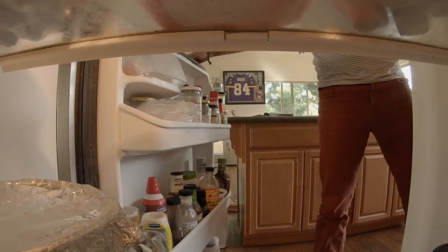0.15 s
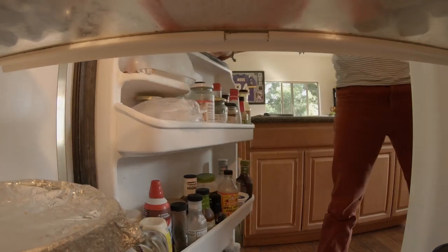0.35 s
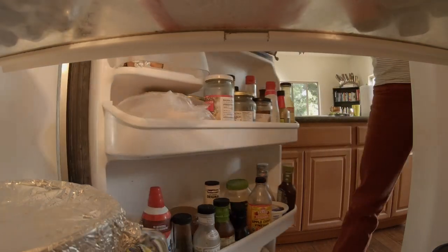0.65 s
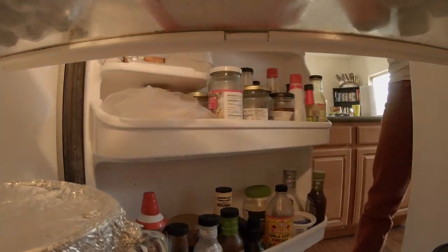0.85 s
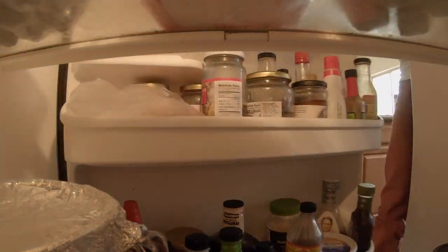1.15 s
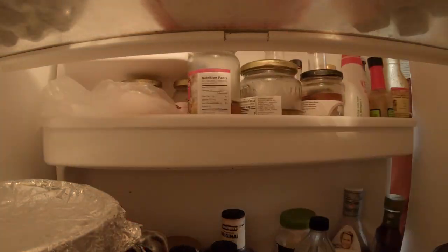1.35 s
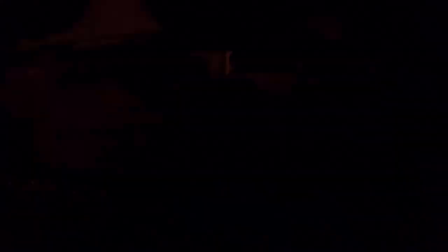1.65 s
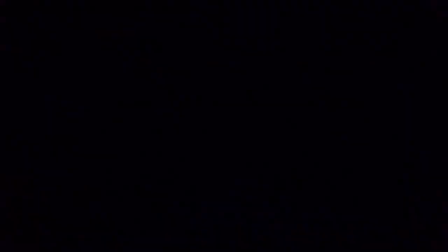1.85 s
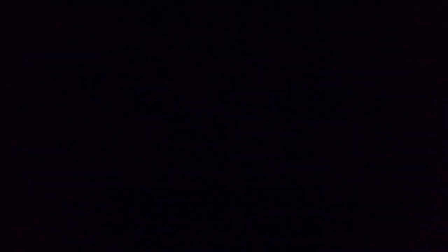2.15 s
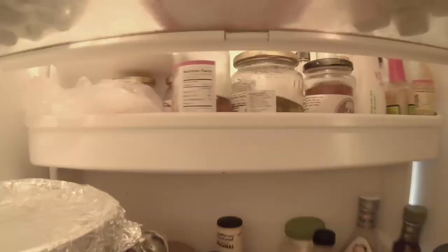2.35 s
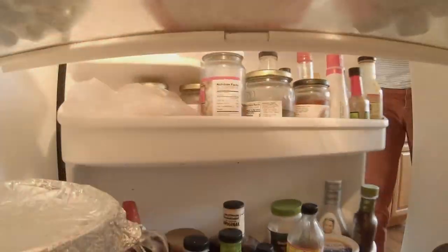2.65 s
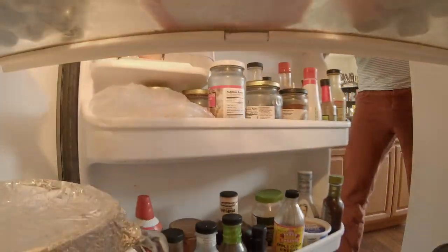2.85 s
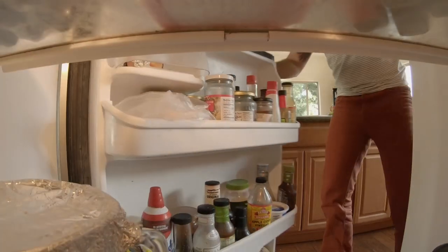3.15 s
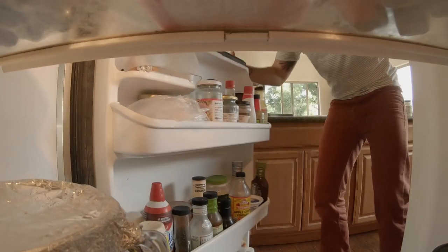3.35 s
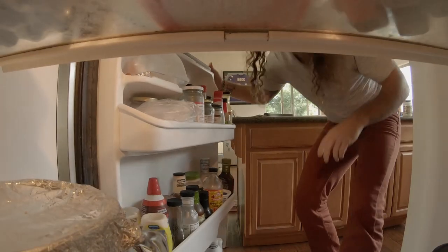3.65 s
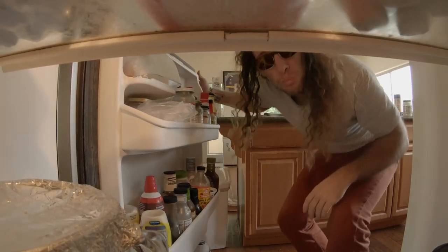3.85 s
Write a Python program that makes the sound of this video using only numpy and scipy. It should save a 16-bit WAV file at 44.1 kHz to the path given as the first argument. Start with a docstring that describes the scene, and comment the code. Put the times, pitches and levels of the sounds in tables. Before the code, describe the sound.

From a shelf inside a refrigerator, the door clicks a switch and thumps shut, jars and bottles rattling. The hum softens, then the gasket peels and pops open again; close stereo microphone in a kitchen.

```python
"""A refrigerator door swings in, trips the light switch and thumps shut, heard from a shelf inside:
low decaying sines for the blows, banded noise bursts for the contacts, dying partials for what rings.
Jars and bottles rattle in the racks and settle; the gasket peels open in a crackle and a pop.
Compressor and fan hum throughout as sine lines, softer after the door has shut, with shaped noise
for the fan air, the closed cabinet, the kitchen and the clothing that brushes past."""
import sys
import numpy as np
from scipy import signal
from scipy.fft import rfft, irfft
from scipy.io import wavfile
from scipy.ndimage import uniform_filter1d

SR = 44100
rng = np.random.default_rng(int(sys.argv[2]) if len(sys.argv) > 2 else 0)


def transcribe(signal):
    """Save signal, clipped to [-1, 1], as a 16-bit WAV file at the path in sys.argv[1]."""
    frames = np.atleast_2d(signal).T
    limited = np.clip(frames, -1, 1)
    pcm = np.round(limited * 32767).astype(np.int16)
    wavfile.write(sys.argv[1], SR, pcm)


N = 176400
T = np.arange(N) / SR  # seconds

# Colour of the plastic door racks. Each row: frequency in Hz, relative level in dB.
RACK_COLOUR = [(170, -6), (290, 7.5), (400, -2), (560, -5), (850, 1.5), (1050, -5.5), (1400, -2.5),
               (2000, -0.5), (3100, -5), (4000, -11), (4900, -15), (5500, -7.5), (7800, -8.5),
               (8600, -19.5), (12000, -33.5), (15500, -44)]
HUM_WAVER_DB, HUM_WANDER_RAD = 1.48, 0.12  # rms drift of each line's level and phase


def amp(db):
    """Decibels to gain."""
    return 10 ** (np.asarray(db) / 20)


def unit(x):
    """Scales to rms 1."""
    return x / np.sqrt(np.mean(x ** 2) + 1e-20)


def curve(points):
    """A control curve at every sample, straight between its points."""
    return np.interp(T, *np.transpose(points))


def spectrum(points, hz):
    """Reads a table on a log-frequency axis."""
    f, value = np.transpose(points)
    return np.interp(np.log(hz + 1), np.log(f + 1), value)


def pan(db):
    """Left and right gains for a level difference."""
    return amp(np.array([np.atleast_1d(db), -np.atleast_1d(db)]) / 2)


def pair(a, b, same):
    """Two channels of given likeness from two unrelated noises."""
    same = np.clip(same, -1, 1)
    mid = np.sqrt((1 + same) / 2) * a
    side = np.sqrt((1 - same) / 2) * b
    return np.array([mid + side, mid - side])


def decay(t, t60):
    """Falls 60 dB in t60."""
    return np.exp(-np.log(1000) * t / t60)


def soft_rise(t, rise):
    """A rounded onset, as of a blow that takes a moment to press in."""
    return 1 - np.exp(-(t / rise) ** 2)


def add(mix, s, sound):
    """Mixes a sound in at a time."""
    part = mix[:, round(s * SR):][:, :sound.shape[-1]]
    part += sound[..., :part.shape[1]]


def drift(count=24):
    """A slow random curve through a given count of random values."""
    values = signal.resample(rng.standard_normal(count), count * 10)
    return np.interp(T, np.linspace(0, T[-1], count * 10), values)


def swells(rows):
    """Smooth bumps of level."""
    return sum(amp(db) * np.exp(-((T - s) / width) ** 2) for s, width, db in rows)


def ring(modes):
    """A struck object: a few dying partials, each ear with its own phase."""
    t = np.arange(SR // 2) / SR
    out = np.zeros((2, len(t)))
    for hz, db, t60 in modes:
        phase = 2 * rng.random((2, 1))  # radians
        out += amp(db) * decay(t, t60) * np.sin(2 * np.pi * hz * t + phase)
    return np.minimum(t / 0.005, 1) * out  # 5 ms fade-in


def ring_at(s, modes):
    """One ringing blow placed in the scene."""
    out = np.zeros((2, N))
    add(out, s, ring(modes))
    return out


def crackle(colour, grain_db, same, size=48):
    """Countless tiny contacts of uneven strength, in a given colour."""
    strength = amp(grain_db * np.repeat(rng.standard_normal(N // size + 1), size)[:N])
    grains = rng.standard_normal((2, N)) * strength
    gain = amp(spectrum(colour, np.fft.rfftfreq(N, 1 / SR)))
    return unit(pair(*irfft(rfft(grains) * gain, N), same))


def air(colour):
    """Stereo noise in a given colour, with narrow fixed ripples over pitch and drifting patches."""
    # Each row: frequency in Hz, left-right difference in dB.
    balance = [(60, 2.5), (150, -3), (380, -5.5), (950, -1.5), (2400, -.5), (15000, 1)]
    # Each row: frequency in Hz, left-right likeness from 0 to 1.
    likeness = [(60, 0.97), (150, 0.99), (380, 0.72), (950, 0), (2400, 0.58), (6000, 0.15), (15000, 0.063)]
    patch_db, ripple_db = 1.2, 2.8
    hz = np.fft.rfftfreq(4096, 1 / SR)
    a, b, c, d, patches = rng.standard_normal((5, N // 1024 + 4, len(hz)))
    patches = uniform_filter1d(patches, size=4, axis=0)  # along time
    patches = unit(uniform_filter1d(patches, size=30, axis=1))  # along pitch
    ripple = unit(uniform_filter1d(rng.standard_normal(len(hz)), size=6))
    ripple = ripple * np.clip(hz / 600 - 0.5, 0, 1)  # none below 300 Hz, full from 900 Hz
    z = pair(a + 1j * b, c + 1j * d, spectrum(likeness, hz))
    z = z * pan(spectrum(balance, hz))[:, None]
    z = z * amp(spectrum(colour, hz) + patch_db * patches + ripple_db * ripple)
    return unit(signal.istft(z.transpose(0, 2, 1), nperseg=4096, noverlap=3072)[1][:, :N])


def door_thumps():
    """Low blows of the door on the cabinet and the trapped air: sines that die away."""
    # Each row: start in seconds, pitch in Hz, level in dB, t60 in seconds.
    blows = [(1.639, 34.3, -3.5, 0.15), (1.715, 27.2, -13, 0.34), (1.843, 97, -22, 0.1),
             (2.276, 36.8, -19.5, 0.14)]
    out, t = np.zeros((2, N)), np.arange(SR // 2) / SR
    for s, hz, db, t60 in blows:
        envelope = soft_rise(t, 0.0064) * decay(t, t60)
        thump = -np.sin(2 * np.pi * hz * t) * envelope  # the first swing is negative
        add(out, s, amp(db) * pan(db=-3.0) * thump)
    return out


def knock(levels_db, shaken, size=16384):
    """A grainy plastic clack dies quickly, leaving the cabinet's tail and the ring of any shaken jars."""
    # Each row: lower edge in Hz, rise in s, t60 of the contact in s, t60 of the cabinet in s,
    # cabinet level in dB against the contact, left-right likeness, left-right difference in dB.
    bands = [(170, .002, .08, .33, -17, .6, -3), (540, .002, .07, .3, -16, .1, -3),
             (1400, .0018, .06, .24, -19, .5, -1), (4900, .002, .065, .2, -21, .1, 0)]
    # Ringing of the jars and racks. Each row: pitch in Hz, relative level in dB.
    jar_modes = [(414, 2), (674, 1), (895, 2), (1664, 2), (2128, 3), (2750, 1), (3709, -5), (5538, -1),
                 (6108, -1), (7088, -2)]
    jar_db, jar_scatter_db = -15, 3.5
    jar_t60_s, jar_damping = 0.24, 0.2  # t60 at 1 kHz; it falls with pitch by this power
    t, hz = np.arange(size) / SR, np.fft.rfftfreq(size, 1 / SR)
    strength = amp(3.0 * np.repeat(rng.standard_normal(size // 32), 32))  # grains vary by 3 dB rms
    grains = rng.standard_normal((2, size)) * strength
    z = rfft(grains) * amp(spectrum(RACK_COLOUR, hz))
    out = np.zeros((2, size))
    tops = [band[0] for band in bands[1:]] + [SR / 2]
    for db, top, band in zip(levels_db, tops, bands):
        low, rise, t60, tail_t60, tail_db, same, pan_db = band
        edges = np.sqrt((1 + (low / (hz + 1)) ** 10) * (1 + (hz / top) ** 20))
        noise = pair(*irfft(z / edges), same)
        quick = decay(t, t60)
        # even loudness from knock to knock, weighed under the quick decay
        noise = noise / np.sqrt(np.sum((noise * quick) ** 2) / (2 * np.sum(quick ** 2)))
        sound = noise * (quick + amp(tail_db) * decay(t, tail_t60))
        for mode_hz, mode_db in jar_modes:
            if shaken and low <= mode_hz < top:
                phase, scatter = rng.random((2, 1)), rng.standard_normal((2, 1))
                fade = decay(t, jar_t60_s * (mode_hz / 1000) ** -jar_damping)
                level = amp(jar_db + mode_db + jar_scatter_db * scatter)
                sound += level * fade * np.sin(2 * np.pi * (mode_hz * t + phase))
        out += amp(db) * pan(pan_db) * soft_rise(t, rise) * sound
    return out


def contacts():
    """Door, switch, gasket and jars knock one by one, each a clack with its own balance of bands."""
    # Each row: start in seconds, then the levels of the low, middle, upper and treble band in dB.
    knocks = [(1.547, -53, -32, -27, -40.5), (1.553, -25.5, -39, -46, -42.5), (1.6217, -33, -27, -41, -33),
              (1.631, -32, -50, -25, -20.5), (1.639, -25, -27.5, -21.5, -23.5),
              (1.6465, -25, -34, -34, -19.5), (1.665, -27, -30, -35, -28.5), (1.72, -28.5, -32.5, -35, -34),
              (1.733, -26, -31.5, -47, -42), (1.745, -29.5, -35, -44, -33.5), (1.784, -35.5, -50, -42, -37),
              (1.825, -48, -45, -46, -40.5), (1.8446, -32, -41.5, -42, -37), (1.872, -39, -49, -46, -43),
              (1.911, -47, -50, -55, -49), (1.931, -61, -54, -58.5, -50), (1.95, -56, -66, -58, -52),
              (1.979, -44, -51, -73, -68), (2.0021, -44.5, -67, -59.5, -53.5),
              (2.0533, -46, -70, -64, -57.5), (2.2157, -43.5, -60, -48.5, -49.5),
              (2.2625, -38.5, -49, -52.5, -61), (2.296, -46, -51.5, -47.5, -68.5),
              (2.301, -39.5, -50, -54.5, -69.5), (2.5365, -52, -64, -54, -62),
              (2.8064, -78.5, -77.5, -71, -65)]
    # The jars ring only from the slam until they settle: start and end in seconds.
    shaken_from, shaken_to = (1.6, 2.1)
    out = np.zeros((2, N))
    for s, *levels_db in knocks:
        add(out, s, knock(levels_db, shaken_from < s < shaken_to))
    return out


def shelf_jolts():
    """The loaded door shelves are jolted by the slam and its rebounds and ring in low partials."""
    # Each row: start in seconds, level in dB.
    jolts = [(1.623, -32), (1.644, -29.5), (1.722, -32), (1.845, -47)]
    # Each row: pitch in Hz, level in dB against the jolt.
    shelf_modes = [(285, -1), (325, 1), (420, -3), (592, -6), (725, -4), (842, -2), (1357, -12)]
    out = np.zeros((2, N))
    for s, db in jolts:
        modes = [(hz, db + mode_db, 0.26) for hz, mode_db in shelf_modes]  # t60 0.26 s
        add(out, s, pan(db=-4.0) * ring(modes))
    return out


def chatter():
    """Each rebound of the door sets jars and bottles chattering; it builds quickly and dies away."""
    # Each row: start in seconds, rise in seconds, t60 in seconds, level in dB.
    bursts = [(1.604, 0.034, 0.32, -24.5), (1.715, 0.028, 0.22, -40), (1.78, 0.011, 0.25, -43.5)]
    level = 0
    for s, rise, t60, db in bursts:
        t = np.maximum(T - s, 0)
        build = np.minimum(t / rise, 1) ** 2
        level = level + amp(db) * build * decay(np.maximum(t - rise, 0), t60)
    return crackle(RACK_COLOUR, grain_db=3, same=0.22) * level * pan(db=-2.0)


def switch_click():
    """The plunger of the light switch is tripped and rings briefly."""
    # Each row: pitch in Hz, level in dB, t60 in seconds.
    plunger = [(1585, -25.5, 0.072), (1880, -26, 0.051), (2920, -29, 0.04)]
    return ring_at(1.5475, plunger)


def bottle_clink():
    """Two bottles touch: three high glass partials."""
    # Each row: pitch in Hz, level in dB, t60 in seconds.
    glass = [(4080, -28.5, 0.066), (5950, -34, 0.053), (7700, -37, 0.081)]
    return ring_at(1.745, glass)


def gasket_pop():
    """The gasket lets go with a hollow pop of three short partials."""
    # Each row: pitch in Hz, level in dB, t60 in seconds.
    hollow = [(505, -37.5, 0.09), (1297, -40.5, 0.045), (2050, -37.5, 0.033)]
    return ring_at(2.2985, hollow)


def rubbing():
    """Friction: clothing brushes past the door in soft swells, the gasket peels off in a fine crackle."""
    # Each row: centre in seconds, half width (to 1/e) in seconds, level in dB.
    rustles = [(.86, 0.058, -55.5), (1.3, .035, -62), (3.98, 0.3, -66.5)]
    # The peeling gasket, same columns.
    peels = [(2.208, 0.017, -58.5), (2.26, 0.025, -57.5)]
    # Each row: frequency in Hz, relative level in dB.
    rub_colour = [(300, -7), (1000, -1), (3500, 1), (4500, -2.5), (7500, -8), (9000, -18), (15000, -32)]
    cloth = air(rub_colour) * swells(rustles)
    gasket = crackle(rub_colour, grain_db=0.5, same=0.62) * swells(peels)
    return cloth + gasket


def hum():
    """Fan and compressor lines; the compressor beats slowly against the mains hum."""
    # Each row: pitch in Hz, dB before the door shuts, dB afterwards, left-right dB before;
    # the level curves below add to these.
    lines = [(47.8, -32, -51.5, 1), (58, -38, -41.5, 14.5), (117, -36.5, -42.5, -1.5),
             (119.88, -31.5, -53, -3.5), (144.5, -41, -48.5, 2), (157, -48.5, -45, 2),
             (292.6, -53.5, -48.5, -2)]
    # Level while the door swings in, then from when it is shut. Each row: time in seconds, dB.
    level_before = [(0, -2), (1.0, 1), (1.55, 2), (1.69, -4), (1.88, 3.5), (1.96, -7), (2.1, -62)]
    level_after = [(1.7, -50.5), (1.95, -5), (2.15, -7.5), (2.5, -3), (2.9, -4.5), (4, -3)]
    # The first hum drifts out of step between the ears as the door seals.
    # Each row: time in seconds, left-right phase in radians.
    ear_skew = [(1.66, 0.41), (1.8, 2.74)]
    # The lines above 130 Hz return as the door swings open. Each row: time in seconds, dB.
    fan_return = [(2.2, -12), (2.8, 2)]
    beat_peak_s = 0.82  # the lines coincide here, but for their wander
    before, after = amp(curve(level_before)), amp(curve(level_after))
    skew = np.array([[0.5], [-0.5]]) * curve(ear_skew)
    out = np.zeros((2, N))
    for hz, before_db, after_db, pan_db in lines:
        phase = 2 * np.pi * hz * (T - beat_peak_s) + HUM_WANDER_RAD * drift()
        opened = amp(curve(fan_return)) if hz > 130 else 1
        first = before * amp(before_db) * pan(pan_db) * np.cos(phase + skew)
        later = after * opened * amp(after_db) * np.cos(phase)
        out += np.sqrt(2) * (first + later) * amp(HUM_WAVER_DB * drift())
    return out


def whine():
    """Faint multiples of the compressor's shaft speed, softer once the door has shut."""
    # Each row: multiple of the shaft speed, level in dB ahead of the level curve.
    multiples = [(11, -71), (12, -68.5), (13, -75), (14, -68), (19, -73), (22, -76), (23, -77.5),
                 (33, -81.5), (46, -81.5), (47, -77.5)]
    # Each row: time in seconds, level change in dB.
    whine_level = [(1.65, 0), (2.05, -16), (2.8, -8.5)]
    shaft_hz = 58.58
    out = np.zeros((2, N))
    for multiple, db in multiples:
        start = 2 * rng.random((2, 1))  # radians, one per ear
        phase = 2 * np.pi * multiple * shaft_hz * T + start + HUM_WANDER_RAD * drift()
        out += np.sqrt(2) * np.cos(phase) * amp(db + HUM_WAVER_DB * drift())
    return out * amp(curve(whine_level))


def fan_air():
    """Moving air of the fan: coloured noise that fades as the door shuts."""
    # Each row: frequency in Hz, relative level in dB per Hz.
    fan_colour = [(20, -14.5), (60, -6), (100, 4), (150, 0.5), (230, -15), (290, -8), (380, -26),
                  (800, -32.5), (970, -34.5), (1120, -23.5), (1220, -38), (1490, -31.5), (1620, -45.5),
                  (2300, -42.5), (2375, -32), (2470, -43), (2900, -44), (3220, -37.5), (3900, -53),
                  (4800, -55), (6000, -49), (7600, -49), (9000, -59.5), (15000, -84)]
    # Each row: time in seconds, level in dB.
    fan_level = [(0, -37), (.7, -34), (1.2, -35), (1.8, -31.5), (2.05, -70.5)]
    return air(fan_colour) * amp(curve(fan_level))


def closed_cabinet():
    """Dull rumble inside the closed cabinet: low coloured noise."""
    # Each row: frequency in Hz, relative level in dB per Hz.
    shut_colour = [(20, -10.5), (55, 3.5), (160, -5), (230, -20.5), (700, -35.5), (1400, -44.5),
                   (4500, -54.5), (6500, -71), (15000, -82.5)]
    # Each row: time in seconds, level in dB.
    shut_level = [(1.65, -56), (1.85, -30.5), (2.15, -41.5), (2.35, -40.5), (2.599, -40.5), (2.9, -60)]
    return air(shut_colour) * amp(curve(shut_level))


def kitchen():
    """Kitchen air beyond the door, heard the more the wider the door stands open."""
    # Each row: frequency in Hz, relative level in dB per Hz.
    kitchen_colour = [(20, -36), (60, -19), (110, -9.5), (165, 3), (228, -18.5), (290, -9.5), (375, -29.5),
                      (1000, -39), (1300, -35), (1800, -47), (2300, -45.5), (2900, -51.5), (4400, -51),
                      (5400, -62.5), (7200, -77.5), (16000, -86)]
    # Each row: time in seconds, level in dB.
    kitchen_level = [(0, -35.5), (0.701, -37), (1.3, -42), (1.95, -51.5), (2.4, -44), (2.699, -37.5),
                     (4, -34)]
    return air(kitchen_colour) * amp(curve(kitchen_level))


def scene():
    """Everything that reaches the shelf."""
    door = door_thumps() + contacts() + shelf_jolts() + switch_click() + gasket_pop()
    bottles = chatter() + bottle_clink()
    machine = hum() + whine() + fan_air()
    return door + bottles + rubbing() + machine + closed_cabinet() + kitchen()


def record(dry):
    """The stereo image narrows almost to mono after the slam; then a low-pass limits the band."""
    # Each row: time in seconds, stereo width as a share of full.
    width = [(1.92, 1), (2.12, 0.56), (2.7, 0.022), (2.9, 0.0062)]
    mid = dry.mean(0)
    side = (dry[0] - dry[1]) / 2 * curve(width)
    low_pass = signal.firwin(511, 15750, window=("kaiser", 9), fs=SR)  # edge in Hz
    return signal.oaconvolve(np.array([mid + side, mid - side]), low_pass[None], "same")


dry = scene()
out = record(dry)
transcribe(out)
```